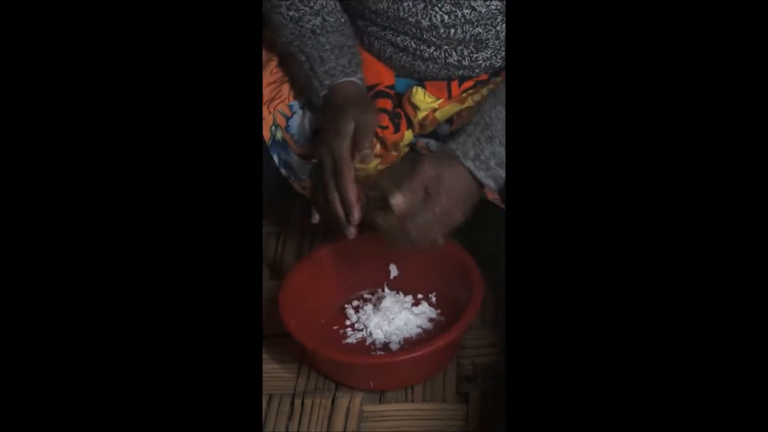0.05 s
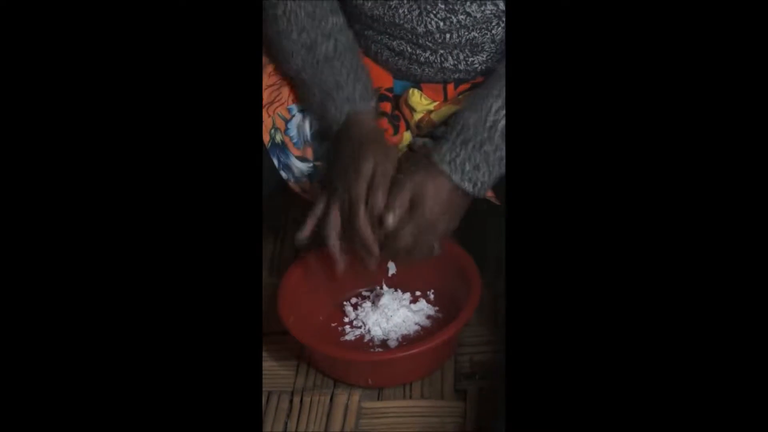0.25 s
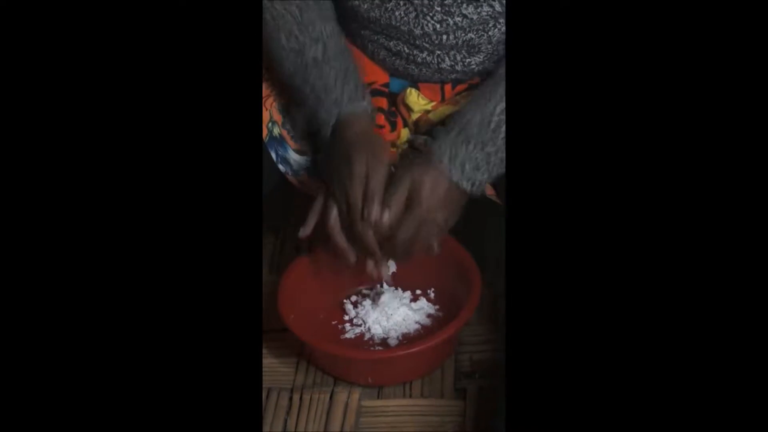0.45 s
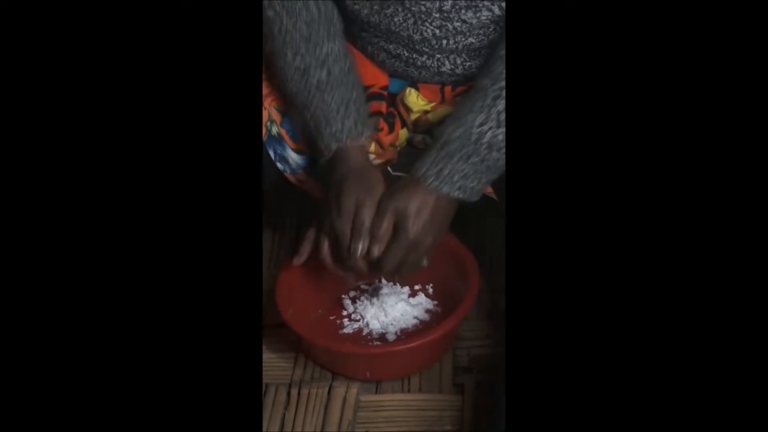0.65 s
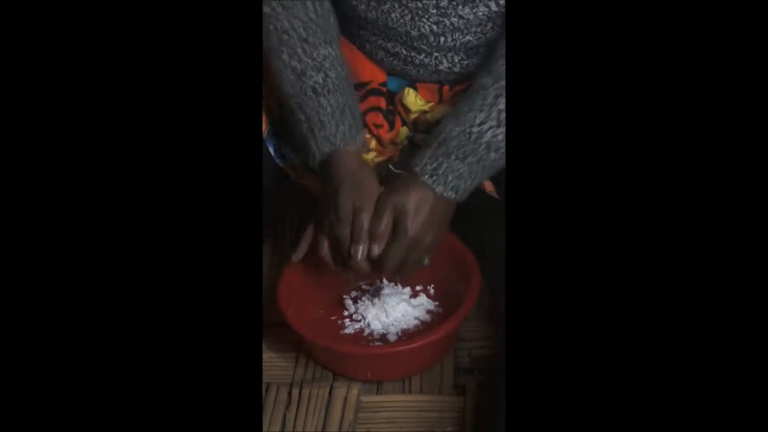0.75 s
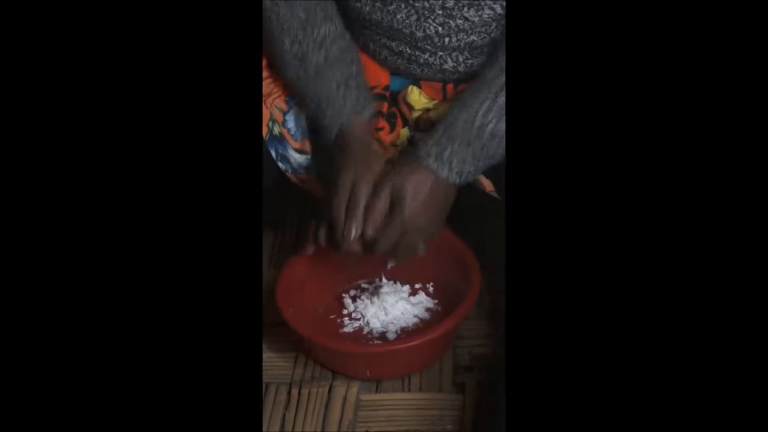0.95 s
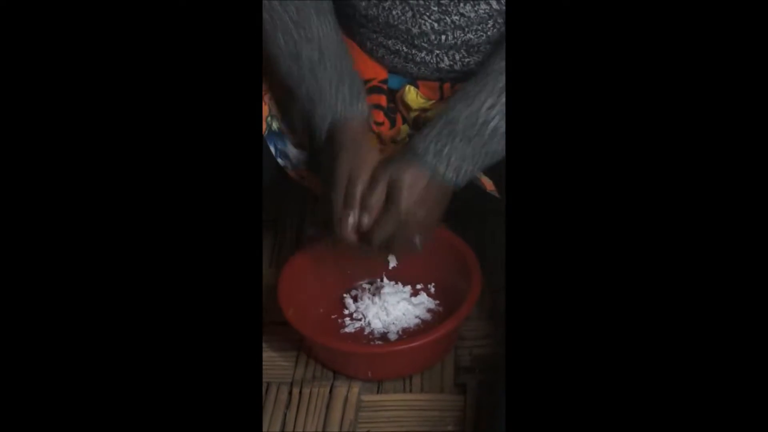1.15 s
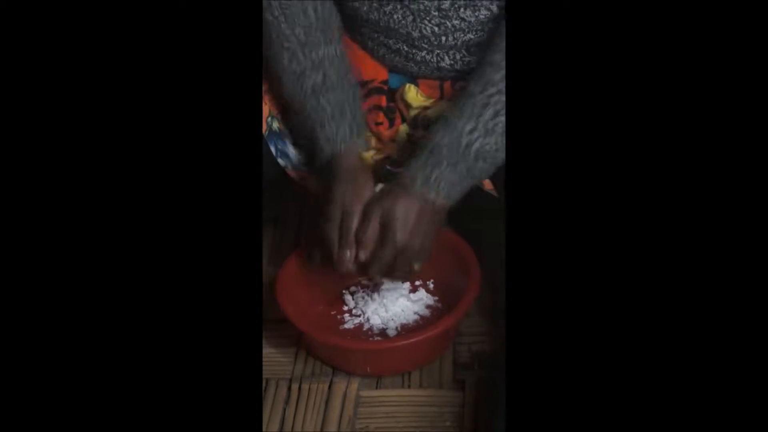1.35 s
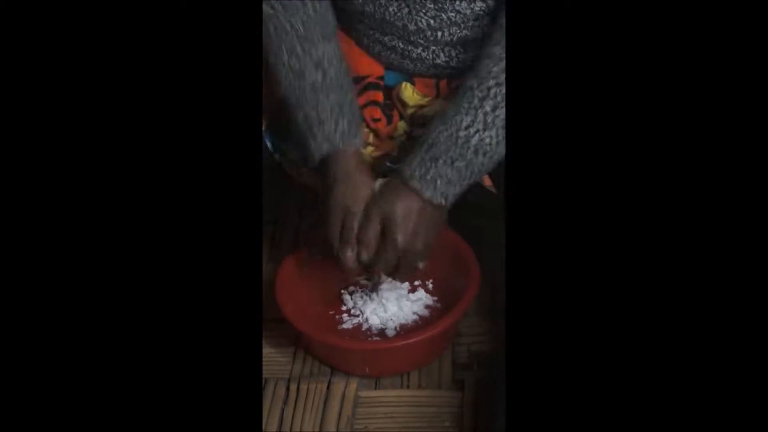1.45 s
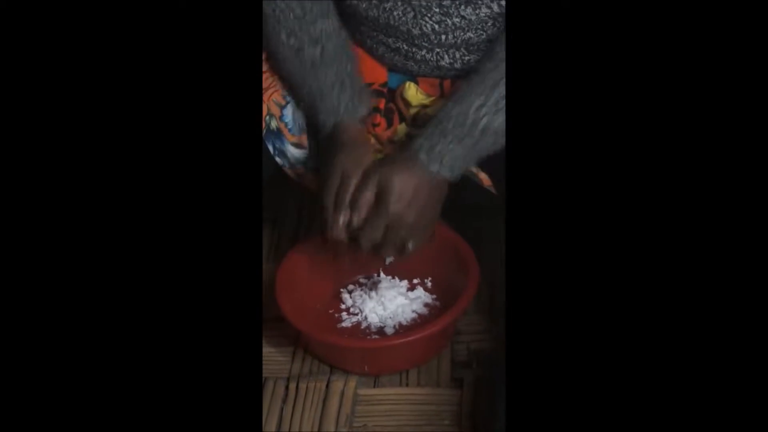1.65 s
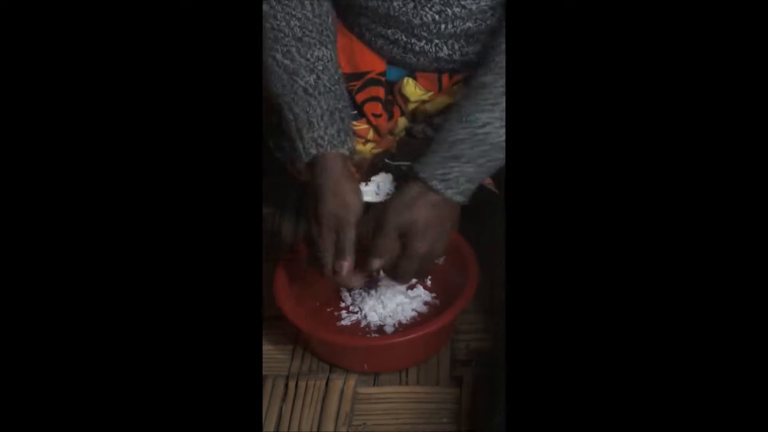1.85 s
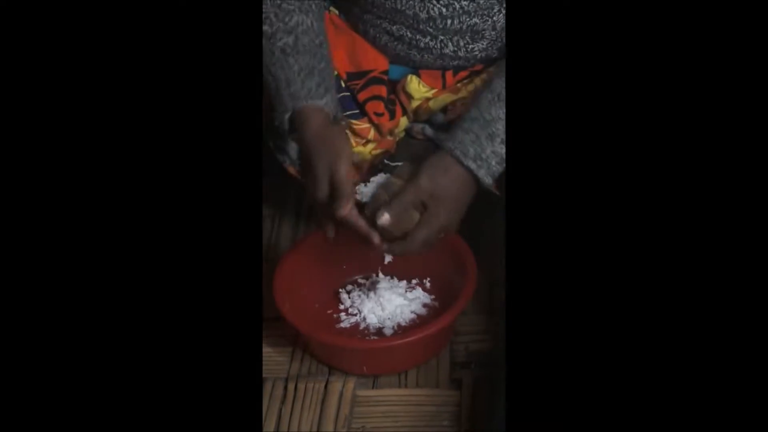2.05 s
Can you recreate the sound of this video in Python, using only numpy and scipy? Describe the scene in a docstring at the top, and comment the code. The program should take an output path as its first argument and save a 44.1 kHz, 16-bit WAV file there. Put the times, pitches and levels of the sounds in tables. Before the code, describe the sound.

Hand grating of coconut: five close, crunchy scrapes with hollow knocks and faint wet squeaks.

```python
"""A small room, a stereo microphone close to a plastic bowl: coconut is grated by hand, five strokes.
In each the shell knocks onto a toothed blade, the teeth tear through the flesh, and the hollow shell
and the blade ring with the tearing. Between strokes the piece brushes lightly back and the wet flesh
squeaks. The work sits in the centre, with short reflections and a steady hiss around it."""
import sys
import numpy as np
from scipy import signal
from scipy.fft import rfft, irfft, next_fast_len
from scipy.io import wavfile
from scipy.ndimage import uniform_filter1d, minimum_filter1d, map_coordinates

SR = 44100
rng = np.random.default_rng(int(sys.argv[2]) if len(sys.argv) > 2 else 0)


def persist_wave(psi):
    """Save psi, clipped to +-1, as 16-bit WAV."""
    counts = np.round(np.clip(psi, -1, 1) * 32767).astype(np.int16)
    wavfile.write(sys.argv[1], SR, np.atleast_2d(counts).T)


N = 92610


def amp(db):
    """Decibels to gain."""
    return 10 ** (np.asarray(db) / 20)


def unit(x):
    """Scale to rms 1."""
    return x / np.sqrt(np.mean(x ** 2) + 1e-20)


def along(points, hz):
    """Read a curve of (Hz, value) points on a log frequency axis."""
    freqs, values = np.transpose(points)
    return np.interp(np.log(hz + 1), np.log(freqs + 1), values)


def clock():
    """Time of each sample in seconds."""
    return np.arange(N) / SR


def filtered(x, response):
    """Multiply the spectrum of x by response(Hz)."""
    size = next_fast_len(N + SR // 2)
    return irfft(rfft(x, size) * response(np.fft.rfftfreq(size, 1 / SR)), size)[..., :N]


def coloured(x, points):
    """Shape x by (Hz, dB) points with a minimum-phase filter; rms 1."""
    size = 4096
    cepstrum = irfft(np.log(amp(along(points, np.fft.rfftfreq(size, 1 / SR)))))
    cepstrum[1:size // 2] *= 2
    cepstrum[size // 2 + 1:] = 0
    impulse = irfft(np.exp(rfft(cepstrum)))
    return unit(signal.fftconvolve(x, impulse)[:N])


def ringing(x, modes):
    """Pass x through (Hz, width in Hz, dB) resonances with steep skirts and alternating signs; rms 1."""
    def response(f):
        total = 0
        for k, (hz, width, db) in enumerate(modes):
            peak = 1j * f * width / (hz * hz - f * f + 1j * f * width)
            skirts = 1 + ((f - hz) / (hz / 2)) ** 4
            total += (-1) ** k * amp(db) * peak / skirts
        return total
    return unit(filtered(x, response))


def snaps(rate, spread_db, smooth):
    """Fibres snap at random, rate a second, over a share of smooth friction."""
    sizes = rng.choice([-1, 1], N) * amp(spread_db * np.clip(rng.standard_normal(N), -2, 2))
    clicks = unit(sizes * (rng.random(N) < rate / SR))
    return unit(clicks + smooth * rng.standard_normal(N))


def wobble(rate):
    """A smooth random curve, rate knots a second."""
    return map_coordinates(rng.standard_normal(N // 4), [clock() * rate], mode="wrap")


def swell(peak, hold, rise, fall):
    """Rise to 1 at peak seconds, hold, then fall; slopes in dB per second."""
    t = clock()
    return amp(-rise * np.maximum(peak - t, 0) - fall * np.maximum(t - peak - hold, 0))


def touching(touch, lift):
    """A gate, open while the flesh lies on the blade."""
    return swell(touch, lift - touch, rise=12000, fall=700)


# The room's hiss and rumble at the microphone. Each row: frequency in Hz, level in dB.
HISS_COLOUR = [(15, -53), (25, -36.5), (399, -7.5), (537, -9), (665, -6.5), (803, -7.5), (1200, -4),
               (1570, -7.5), (4370, -9.5), (5000, -12.5), (5420, -14), (9040, -7.5), (15500, -35)]
RUMBLE_COLOUR = [(20, -2), (60, -21), (150, 4), (400, -22)]
def room_tone():
    """Steady hiss, partly shared by left and right, over a faint rumble."""
    shared, left, right = [coloured(rng.standard_normal(N), HISS_COLOUR) for _ in range(3)]
    hiss = unit(shared + 1.15 * np.array([left, right]))
    rumble = coloured(rng.standard_normal(N), RUMBLE_COLOUR)
    return amp(-41.5) * hiss + amp(-80) * rumble


# Wet slips on the blade. Each row: start in seconds, nominal length in seconds, pitch in Hz,
# glide in octaves per second, relative level in dB, roughness as a share of the pitch.
WET_SLIPS = [(0.018, 0.055, 326, -3, -48.5, 0.13), (0.225, 0.025, 930, 1, -45, 0.024),
             (0.236, 0.038, 1650, -1, -27.5, 0.11), (0.286, 0.084, 354.3, 0.5, -21, 0.032),
             (0.333, 0.0067, 7000, 4, -14.5, .17), (0.402, 0.087, 347.8, -4, -31.5, 0.044),
             (0.5, 0.088, 310, 4, -31.5, 0.068), (0.809, 0.038, 2350, -7.5, -40.5, 0.11),
             (0.884, 0.014, 320, -8, -44.5, 0.054), (0.891, 0.048, 2687, -8, -34, 0.146),
             (1.213, 0.054, 3220, -3.5, -42, 0.037), (1.22, 0.032, 425, -17, -41, 0.053),
             (1.265, 0.052, 1251, -9, -26.5, 0.086), (1.334, 0.021, 2900, -1, -19.5, 0.045),
             (1.381, 0.022, 9350, -2, -19, 0.0675), (1.911, 0.023, 1593, -2, -44, .02),
             (1.946, 0.014, 1238, 1, -32, 0.027), (1.974, 0.02, 1405, 0.5, -43, 0.056),
             (2.07, 0.024, 308.4, 3, -43.5, 0.046), (2.091, 0.024, 2300, 1, -33.5, 0.22)]
def squeaks():
    """Wet flesh slips with small, rough tones, many of them falling."""
    out = np.zeros(N)
    for start, length, hz, glide, db, roughness in WET_SLIPS:
        t = np.clip(clock() - start, 0, 2 * length)
        pitch = hz * 2 ** (glide * t) * (1 + roughness * wobble(900))
        tone = np.sin(2 * np.pi * np.cumsum(pitch) / SR)
        flutter = unit(amp(3.2 * wobble(250)))
        envelope = swell(start + 0.0047, length / 2, rise=2700, fall=20 / length)
        out += amp(db + 3.5) * flutter * tone * envelope
    return out


# Light brushing (also the colour of the ticks) and its sheen. Each row: frequency in Hz, level in dB.
BRUSH_COLOUR = [(88, -75), (150, -33), (263, -15), (462, -11), (1290, -8.5), (1600, -11.5), (1870, -8),
                (2310, -7.5), (6470, -8.5), (8650, 1), (13300, -19.5), (15500, -51)]
SHEEN_COLOUR = [(3000, -50), (7500, -12), (10000, 4), (13000, -5), (15000, -7)]
# Passes back over the blade. Each row: touch, peak and lift in seconds, level in dB,
# rise and fall in dB per second, sheen in dB relative to the brushing.
BACK_PASSES = [(0.023, 0.054, 0.13, -31.5, 304, 350, -22), (.431, 0.485, 0.572, -18.5, 196, 210, -6.5),
               (1.517, 1.562, 1.605, -25, 96, 230, -23), (1.953, 1.984, 2.39, -26.5, 298, 128, -21)]
def brushing_back():
    """Without pressure the flesh only brushes back over the teeth; a brisk pass adds a high sheen."""
    grit = snaps(rate=3500, spread_db=3.5, smooth=1.07) * amp(1.35 * wobble(120))
    brush = coloured(grit, BRUSH_COLOUR)
    sheen = coloured(snaps(rate=5000, spread_db=5, smooth=0.8), SHEEN_COLOUR)
    out = np.zeros(N)
    for touch, peak, lift, db, rise, fall, sheen_db in BACK_PASSES:
        envelope = swell(peak, 0.0017, rise, fall) * touching(touch, lift)
        out += amp(db) * (brush + amp(sheen_db) * sheen) * envelope
    return out


# Knock, crack and fine fizz (also heard in the grating). Each row: frequency in Hz, level in dB.
KNOCK_COLOUR = [(50, -40), (100, -18), (220, -15.5), (330, -3), (500, -19.5), (800, -12), (1000, -1.5),
                (1270, -0.5), (1600, -9), (2200, -13.5), (4000, -15.5), (10000, -60), (15000, -46)]
CRACK_COLOUR = [(100, -65), (400, -4.5), (1200, 0.5), (2200, -4.5), (4000, -12), (8000, -10), (11000, -18),
                (15000, -36)]
FIZZ_COLOUR = [(200, -45), (1500, -5), (4000, -3), (5500, -2.5), (6500, -5.5), (7700, 3.5), (9000, 0.5),
               (10000, -4), (11200, -15.5), (13000, -26), (15500, -41)]
# The shell meets the blade. Each row: time in seconds, knock, crunch and crack levels in dB,
# fall of knock and crunch in dB per second.
LANDINGS = [(.162, -39.5, -43.5, -45, 298), (.22, -27, -38.5, -26, 147), (0.232, -27, -29, -30, 215),
            (0.514, -23, -49, -48, 548), (0.544, -16.5, -35, -20.5, 377), (.612, -19, -21, -17.5, 248),
            (0.651, -18.5, -33, -11, 500), (0.883, -33.5, -45, -32, 326), (.917, -45, -34, -45, 300),
            (1.265, -22.5, -44, -39, 208), (1.272, -30.5, -29, -27, 326), (1.523, -48, -47, -34.5, 300),
            (1.634, -32, -33, -24, 250)]
def knocks():
    """The piece lands on the blade with a dry crack, a hollow knock and a short crunch."""
    grit = snaps(rate=3000, spread_db=2.5, smooth=0.93)
    knock, crunch = coloured(grit, KNOCK_COLOUR), coloured(grit, FIZZ_COLOUR)
    crack = coloured(rng.standard_normal(N), CRACK_COLOUR)
    hits = np.zeros(N)
    for at, knock_db, crunch_db, crack_db, fall in LANDINGS:
        hits += (amp(knock_db) * knock + amp(crunch_db) * crunch) * swell(at, 0.0011, 11000, fall)
        hits += amp(crack_db) * crack * swell(at, 0.00035, rise=23000, fall=5100)
    return filtered(hits, lambda hz: 1 - np.exp(-(hz / 220) ** 2))  # bass cut


# The shell's broad body and the teeth's rasp, close up. Each row: frequency in Hz, level in dB.
BODY_COLOUR = [(60, -41.5), (110, -24.5), (200, -2), (300, 2), (420, 2), (650, 8), (850, -12), (1050, -6.5),
               (1280, 4.5), (1550, -5), (2200, -24), (5000, -46), (12000, -73)]
RASP_COLOUR = [(150, -67), (500, 15), (1400, -14), (2000, 4), (2600, -1), (3700, 4.5), (4700, -15),
               (6000, -1), (9000, -6), (14000, -66)]
# Resonances of the hollow shell. Each row: frequency in Hz, level in dB.
SHELL_MODES = [(225, -10), (300, -3), (354, 4), (489, -4), (525, -5), (590, -5), (635, 0), (698, -3),
               (789, -2), (956, -2), (1012, -2), (1060, -5), (1150, -4), (1200, -1), (1268, 2), (1315, -5),
               (1539, -7)]
# Resonances of the blade. Each row: frequency in Hz, width in Hz, level in dB.
BLADE_MODES = [(2170, 70, -4), (2290, 60, -4), (2430, 50, 0), (2530, 60, -1), (2900, 110, -1),
               (3085, 60, -4), (3403, 90, 1), (3797, 50, -1), (3970, 100, -5), (4150, 60, -7),
               (5380, 110, -5)]
# Cutting strokes. Each row: touch, full pressure, shell hold and lift in seconds,
# shell, rasp and fizz levels in dB, fizz peak in seconds, fizz fall in dB per second.
CUTTING_STROKES = [(0.195, 0.304, 0.078, 0.42, -20.5, -23, -17, 0.33, 222),
                   (0.595, 0.658, 0.058, .8, -14, -16, -18.5, 0.68, 302),
                   (.915, 0.996, .06, 1.23, -13.5, -17.5, -19, 1.001, 220),
                   (1.285, 1.34, 0.054, 1.487, -13.5, -18, -19, 1.36, 168),
                   (1.638, 1.69, .058, 1.875, -12.5, -17.5, -17.5, 1.716, 192)]
def grating():
    """The teeth judder through the flesh; the snaps ring shell and blade and spray a fine fizz."""
    judder = unit(amp(1.08 * wobble(330) + 0.13 * wobble(90)))
    tear = judder * snaps(rate=1400, spread_db=0.5, smooth=0.22)
    shell_modes = [(hz, 16.7, db) for hz, db in SHELL_MODES]  # each 16.7 Hz wide
    shell_ring = ringing(judder * snaps(rate=810, spread_db=3.5, smooth=0.43), shell_modes)
    shell = unit(coloured(tear, BODY_COLOUR) + amp(3.5) * shell_ring)
    scrape = coloured(tear + 1.18 * judder * rng.standard_normal(N), RASP_COLOUR)
    blade_ring = ringing(judder * snaps(rate=1300, spread_db=-0.5, smooth=0.3), BLADE_MODES)
    rasp = unit(scrape + amp(-1) * blade_ring) + amp(-10.5) * crackle()
    fizz = coloured(judder * snaps(rate=4000, spread_db=0, smooth=0.4), FIZZ_COLOUR)
    out = np.zeros(N)
    for touch, pressed, hold, lift, shell_db, rasp_db, fizz_db, fizz_peak, fall in CUTTING_STROKES:
        stroke = amp(shell_db) * shell * swell(pressed, hold, rise=526, fall=311)
        stroke += amp(rasp_db) * rasp * swell(pressed, hold * 0.85, rise=416, fall=fall * 1.15)
        stroke += amp(fizz_db) * fizz * swell(fizz_peak, 0.029, rise=183, fall=fall)
        out += touching(touch, lift) * stroke
    return out


def crackle():
    """Coarse fibres tear in clumps, bright and dry."""
    clumps = snaps(rate=360, spread_db=5.5, smooth=0) * amp(1.8 * wobble(71.2))
    return coloured(clumps, [(300, -25), (1500, -10.5), (3400, 3), (4600, -11), (8500, 1.5),
                             (10000, -14.5), (12000, -27), (15000, -46)])


# One catch in each stroke. Each row: start in seconds, relative boom and thud levels in dB.
TOOTH_CATCHES = [(0.272, -14.5, -62), (.668, -10.5, -59), (0.994, -0.5, -47), (1.352, -3, -41),
                 (1.686, -7, -34)]
def catches(boom_hz=336.4, boom_t60_s=0.057, thud_hz=46.3, thud_t60_s=0.2):
    """A tooth catches and lets go: one short boom of the hollow and a thud in the blade's support."""
    out = np.zeros(N)
    for start, boom_db, thud_db in TOOTH_CATCHES:
        t = np.maximum(clock() - start, 0)
        boom = amp(boom_db + 5.5 - 60 * t / boom_t60_s) * np.sin(2 * np.pi * boom_hz * t)
        thud = amp(thud_db - 60 * t / thud_t60_s) * np.sin(2 * np.pi * thud_hz * t)
        attack = 1 - np.exp(-t / 0.0064)
        out += (boom + thud) * attack
    return out


# Single short clicks. Each row: time in seconds, level in dB.
DRY_TICKS = [(.477, -18), (1.246, -27), (1.303, -21), (1.599, -27)]
def ticks():
    """A short, dry, bright tick."""
    envelope = sum(amp(db) * swell(at, 0.0005, rise=30000, fall=8100) for at, db in DRY_TICKS)
    return envelope * coloured(rng.standard_normal(N), BRUSH_COLOUR)


def reflections(t60):
    """A stereo burst of reflections, energy about 1 a side, dying by (Hz, seconds to fall 60 dB)."""
    hz, t, spectrum = signal.stft(rng.standard_normal((2, SR // 3)), SR, nperseg=256)
    decay = amp(-60 * t / along(t60, hz)[:, None])
    burst = signal.istft(spectrum * decay, SR, nperseg=256)[1]
    return np.pad(burst / np.linalg.norm(burst[0]), ((0, 0), (60, 0)))  # 60 samples after the direct


# Surfaces near the microphone. Each row: frequency in Hz, level of the stereo side signal in dB.
SIDE_COLOUR = [(60, -58), (300, -27.5), (600, -18.5), (1200, -10.5), (2200, -7.5), (4500, -3.5),
               (12000, -3.5)]
# The small room's tail. Each row: frequency in Hz, seconds to fall 60 dB.
ROOM_DECAY = [(200, 0.12), (2000, 0.19), (10000, 0.16)]
def room(x):
    """Close surfaces spread the treble from side to side; a faint tail follows."""
    early = reflections([(200, 0.068), (2000, 0.035), (10000, 0.031)])[0]
    near = signal.fftconvolve(x, early)[:N]
    side = filtered(near, lambda hz: amp(along(SIDE_COLOUR, hz)))
    tail = signal.fftconvolve(x[None], reflections(ROOM_DECAY), axes=1)[:, :N]
    return np.array([side, -side]) + amp(-13) * tail


def scene():
    """The handwork, close and nearly central before the microphone, in its room."""
    work = grating() + catches() + knocks() + ticks() + brushing_back() + squeaks()
    balance = amp(np.array([[-0.067], [0.067]]))
    return (work + room(work)) * balance + room_tone()


def record(dry):
    """Behind the microphone a fast limiter holds down peaks over full scale; the band ends at 15.5 kHz."""
    needed = 1 / np.maximum(np.abs(dry).max(axis=0), 1)
    gain = uniform_filter1d(minimum_filter1d(needed, size=90), size=90)
    return filtered(dry * gain, lambda hz: hz < 15500)


dry = scene()
out = record(dry)
persist_wave(out)
```